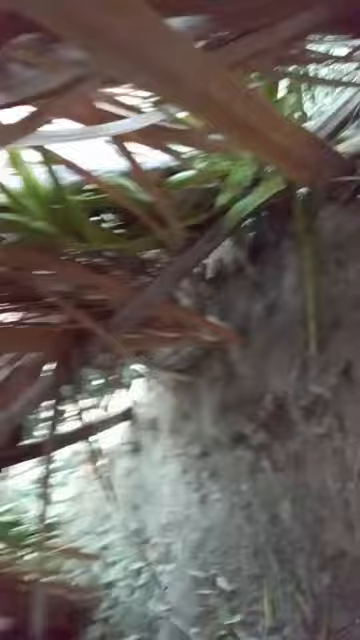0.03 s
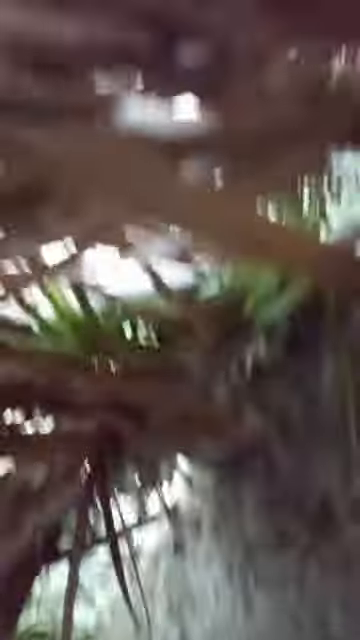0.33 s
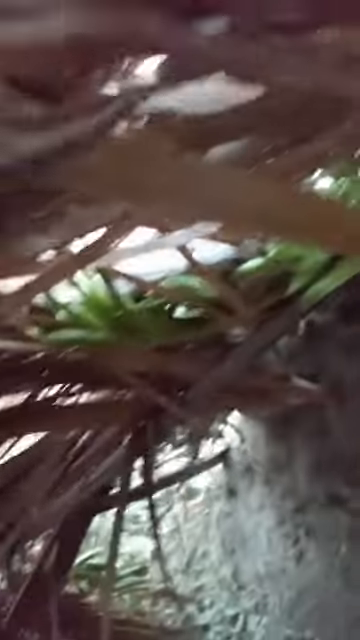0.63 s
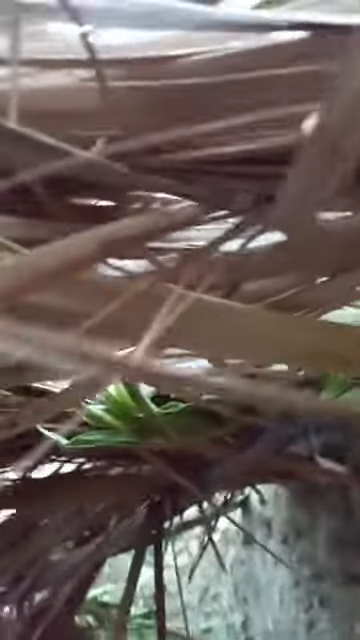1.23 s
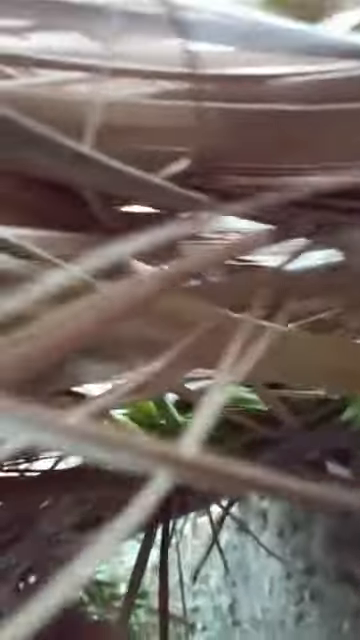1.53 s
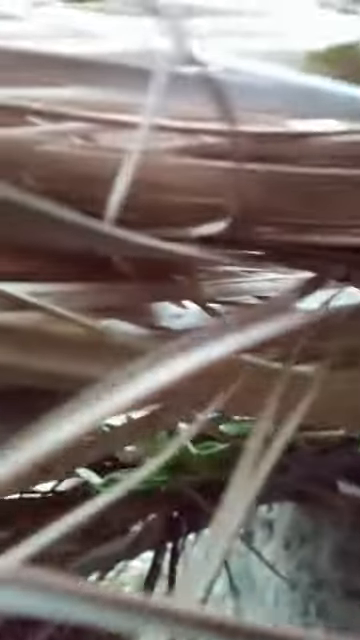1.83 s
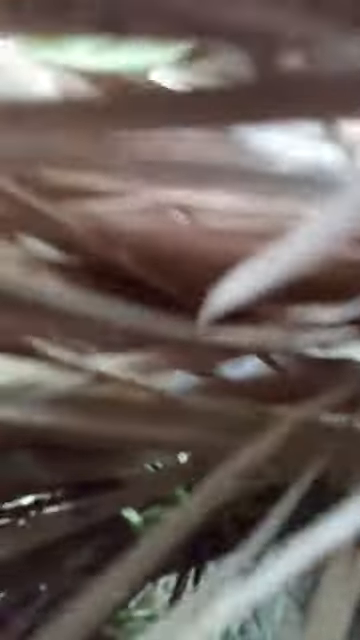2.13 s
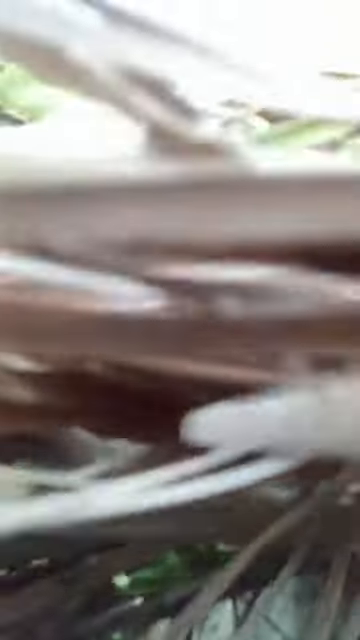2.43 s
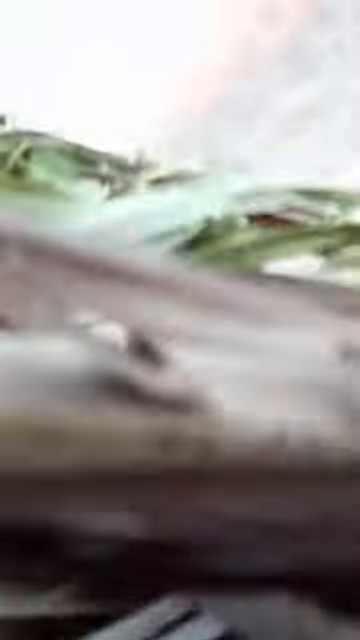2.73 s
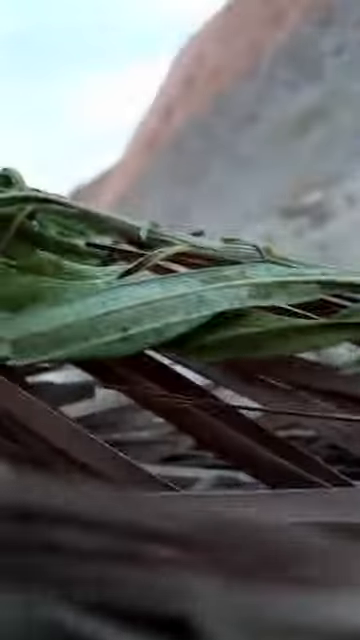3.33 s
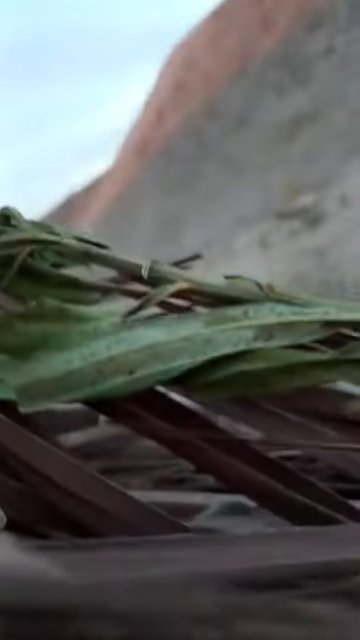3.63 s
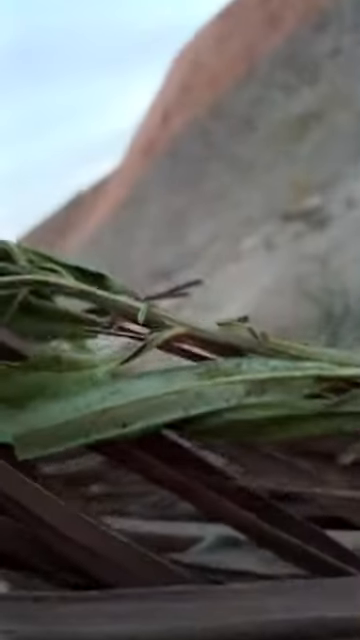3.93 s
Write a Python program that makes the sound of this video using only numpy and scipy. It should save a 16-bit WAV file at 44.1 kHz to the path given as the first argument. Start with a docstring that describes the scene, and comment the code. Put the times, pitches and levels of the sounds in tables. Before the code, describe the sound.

Dry stalks and leaves rustle and crackle as a microphone pushes through them outdoors. Soft wind thumps come first on the right, then crisp close snaps and scrapes take over, above a low rumble and a faint distant engine.

```python
"""A low outdoor rumble and faint hiss fade in as a microphone is pushed through dry stalks and fronds.
Leaves rustle over its two ports by stick-slip friction, and early on air buffets the right port.
Fibres snap in tight clusters of tiny fractures, leaves swish past, and a far engine drones and sinks
in pitch. In the second half, scraping stalks excite the resonances of the housing."""
import sys
import numpy as np
from scipy import signal
from scipy.fft import rfft, irfft
from scipy.io import wavfile

SR = 44100
rng = np.random.default_rng(int(sys.argv[2]) if len(sys.argv) > 2 else 0)


def persist_wave(psi):
    """Save psi, clipped to +-1, as 16-bit WAV."""
    counts = np.round(np.clip(psi, -1, 1) * 32767).astype(np.int16)
    wavfile.write(sys.argv[1], SR, np.atleast_2d(counts).T)


N = 176400
TIME = np.arange(N) / SR

# Spectra of the noise sources. Each row: frequency in Hz, relative level in dB.
RUMBLE_SPECTRUM = [(22,-31),(45,-21.5),(65,-5),(80,0),(130,1),(175,-10.5),(290,-14),(400,-22),(600,-32.5),(1000,-47.5),(3000,-73.5)]
HISS_SPECTRUM = [(100,12.5),(700,2.5),(1600,3.5),(3000,-1.5),(6300,-2.5),(8800,1.5),(11500,-5.5),(16000,-11.5)]
SLIDE_SPECTRUM = [(300,-4.5),(1000,-7),(2200,-4),(4000,-3),(5500,-3.5),(7500,-1),(9500,2),(12000,-4),(16000,-10)]
GUST_SPECTRUM = [(25,-29.5),(45,-5),(70,1),(110,-0.5),(170,-3.5),(250,-15.5),(400,-34.5),(800,-49.5),(2000,-69)]
SNAP_SPECTRUM = [(250,-11),(600,-12.5),(1100,-15.5),(2200,-10.5),(3600,-6.5),(5500,-4),(8000,-0.5),(10200,0.5),(12500,-5),(16000,-11)]
SWISH_SPECTRUM = [(300,-7.5),(1000,-14),(1900,-9),(3000,-6.5),(5500,-5),(7500,-1),(10200,0.5),(12500,-5.5),(16000,-8.5)]
# Envelopes of the sustained sources and the whole scene. Each row: time in seconds, level in dB.
SLIDE_LEFT_LEVEL = [(.3,-82),(1.25,-68.5),(1.5,-78.5),(2.1,-76.5),(2.35,-66.5),(2.41,-52),(2.5,-61),(2.68,-63),(2.77,-54),(2.85,-54),(2.97,-51.5),(3.06,-59),(3.16,-57),(3.21,-57.5),(3.35,-51.5),(3.58,-69),(3.67,-56.5),(3.76,-71),(3.82,-53),(4,-61)]
SLIDE_RIGHT_LEVEL = [(.3,-70),(.55,-73),(.63,-66),(1.2,-66.5),(1.35,-73.5),(2.05,-75),(2.3,-59.5),(2.36,-68),(2.41,-53),(2.57,-67),(2.78,-63),(2.86,-63),(2.9,-56.5),(2.99,-56.5),(3.1,-69.5),(3.22,-69.5),(3.33,-57),(3.43,-64),(3.75,-71),(4,-62.5)]
GUST_LEVEL = [(.3,-59),(.45,-65),(.55,-43.5),(.7,-46),(.81,-43.5),(.87,-36),(.95,-39.5),(1.01,-43),(1.08,-50.5),(1.14,-39),(1.25,-49.5),(1.33,-61),(1.6,-82)]
SCRAPE_LEVEL = [(2.2,-84),(2.37,-94),(2.405,-61.5),(2.48,-68.5),(2.65,-75),(2.8,-60),(2.86,-62.5),(2.99,-50),(3.04,-65.5),(3.14,-60.5),(3.25,-68),(3.37,-54.5),(3.44,-73),(3.76,-72.5),(3.83,-56.5),(3.88,-70),(3.93,-83),(4,-73)]
FADE_IN_LEVEL = [(0,-72),(.12,-46.5),(.2,-22),(.29,-4.5),(.5,-1)]
# Bumps of air. Each row: centre in seconds, level in dB, pitch in Hz, knock relative to thud in dB.
AIR_BUMPS = [(.494,-26.5,96,-21.5),(.625,-25.5,108,-15),(.874,-35,109,-4),(0.895,-34.5,99,-5.5),(0.913,-29,83.5,-3.5),(.945,-32.5,131,-17),(0.962,-31.5,107,-7),(1.164,-26.5,128,-3.5),(1.205,-28.5,95.7,-35),(2.399,-38,136,-0.5)]
# Cracking fibres and passing leaves. Each row: start in seconds, hold in seconds, relative level in dB,
# left over right in dB, tilt in dB per octave, resonance in Hz, its height in dB.
FIBRE_SNAPS = [(0.481, 0.0018, -60.5, -19, -4.5, 8200, 5), (0.693, 0.0044, -63, -11, -3, 13500, 14),
               (1.575, 0.0023, -59, 9, -1, 8100, 8), (2.083, 0.014, -64, 1, -1, 8500, 2),
               (2.173, 0.01, -63.5, 9, -0.3, 2100, 6), (2.37, 0.003, -54, 5, 3, 9400, 4),
               (2.382, 0.0052, -49.5, -3, 2.6, 2000, 8), (2.3986, 0.0081, -32.5, 0.5, 0.5, 9400, 3),
               (2.412, 0.0026, -44, -1, 3, 9200, 1), (2.543, 0.0053, -41.5, 8, 0.7, 2800, 0),
               (2.547, 0.01, -49, 2, -1.0, 8000, 2), (2.593, 0.002, -58, 18, 5, 12700, 8),
               (2.601, 0.006, -49.5, -5, -6.5, 12900, 11), (2.623, 0.0022, -53, 2, 1, 2000, 14),
               (2.6824, 0.0032, -38, 42, -3.5, 9060, 7.5), (2.698, 0.0025, -56, -13, -6.5, 2000, 2),
               (2.753, 0.0014, -49, 17, -5.5, 3240, 13), (2.89, 0.0084, -44.5, 12, -1.5, 7600, 1),
               (2.919, 0.0013, -42, 26, -3.76, 13500, 5), (2.924, 0.0017, -36, 20, 2.3, 2000, -7),
               (2.949, 0.0012, -43, 18, -3, 2000, 2), (2.981, 0.0073, -38.5, 22, -2, 12400, 7),
               (3.001, 0.0045, -36.5, 32, -0.5, 11400, 5), (3.029, 0.0014, -45, 26, -0.7, 7850, 7),
               (3.131, 0.0011, -50.5, 25, -0.2, 2000, 15.5), (3.346, 0.005, -35, 17, 6, 11600, 15),
               (3.3603, 0.0063, -29.5, 0, 1.5, 13200, 6), (3.374, 0.0062, -45, 2, -3.7, 9400, -1),
               (3.443, 0.0063, -46.5, 0, -1.7, 8000, 6), (3.547, 0.0022, -55, 2, -1, 7660, 5),
               (3.567, 0.0025, -55, 11, 1, 8100, 7.5), (3.616, 0.0021, -39, 14, 7, 12600, 10),
               (3.621, 0.0048, -53, 2, -4.5, 6000, 7), (3.629, 0.0024, -44, 9, 6.8, 2000, 10),
               (3.656, 0.004, -47, 8, 8, 2000, 10), (3.781, 0.012, -46.5, 12, 1.2, 8400, 2),
               (3.839, 0.0054, -40, 16, 5.5, 5400, 3), (3.8973, 0.0087, -29.5, 3, 2, 4980, 8.5)]
LEAF_SWISHES = [(0.593, 0.046, -64.5, -18, -1.3, 5730, 4), (0.766, 0.094, -65.5, -12, 7.5, 1930, 16),
                (1.034, 0.066, -55.5, -17, 6.5, 1980, 6), (1.195, 0.047, -63.5, -13, -0.5, 7800, 8),
                (1.272, 0.031, -66, -1, -1, 5000, 8), (1.566, 0.02, -64.5, 3, -0.5, 7600, 4),
                (1.703, 0.023, -49.5, 3, 0.5, 4970, 3.5), (1.829, 0.02, -61.5, 2, 1.2, 4760, 8.5),
                (2.114, 0.017, -65.5, -6, -4, 13500, 0), (2.423, 0.028, -55.5, 1, -2.9, 12700, 6),
                (2.81, 0.017, -54.5, 17, -5, 2230, 11), (2.902, 0.027, -50.5, 22, -2.2, 2000, 0),
                (2.965, 0.025, -47.5, 22, -2, 12800, 5), (3.325, 0.053, -44.5, 7.5, 4, 12900, 1.5),
                (3.644, 0.032, -58.5, -11, -1.5, 1980, 5), (3.812, 0.027, -41.5, 3.5, -0.5, 5170, 4),
                (3.914, 0.033, -50, 0.5, -0.9, 8100, 1.5)]
# The engine's drone. Each row: time in seconds, fundamental in Hz, level in dB.
ENGINE_DRONE = [(.3,123,-79),(1.4,122,-58),(2,119,-55.5),(2.65,112,-54.5),(3.3,108,-56.5),(4,104,-57)]
# Modes of the housing. Each row: frequency in Hz, bandwidth in Hz, relative gain in dB.
HOUSING_MODES = [(228,42,2.5),(348,109,0),(548,150,-3.5),(704,64,-2),(800,140,-11),(2000,650,-20)]


def from_db(db):
    """Amplitude grows tenfold for every 20 dB."""
    return 10 ** (np.asarray(db) / 20)


def unit_rms(x):
    """Normalisation to a mean power of one."""
    return x / np.sqrt(np.mean(x ** 2) + 1e-20)


def in_time(rows):
    """Linear interpolation of each column at every sample."""
    times, *columns = np.transpose(rows)
    return [np.interp(TIME, times, column) for column in columns]


def gain_curve(rows):
    """An amplitude envelope, linear in dB between its points."""
    return from_db(in_time(rows)[0])


def pan(db):
    """Constant-power panning: left exceeds right by db."""
    return unit_rms(from_db([[db / 2], [-db / 2]]))


def colour(x, spectrum, ripple_db=0):
    """Minimum-phase filtering to a spectrum with optional random resonances, at unit power."""
    n = x.shape[-1]
    hz = np.maximum(np.arange(n // 2 + 1) * SR / n, 1)
    points_hz, points_db = np.transpose(spectrum)
    db = np.interp(np.log(hz), np.log(points_hz), points_db)
    db -= 10 * np.log10(1 + (points_hz[0] / 2 / hz) ** 4)  # bass roll-off
    db += ripple_db * np.interp(hz / 300, np.arange(200), rng.standard_normal(200))
    cepstrum = irfft(np.log(from_db(db)), n)
    cepstrum[1:n // 2] *= 2  # folding makes the filter causal
    cepstrum[n // 2 + 1:] = 0
    return unit_rms(irfft(rfft(x) * np.exp(rfft(cepstrum)), n))


def impulses(n, per_s, spread_db):
    """A Poisson process of tiny slips or fractures, very uneven in size."""
    sizes = from_db(spread_db * np.minimum(rng.exponential(1, n), 4))
    return unit_rms(sizes * rng.choice([-1, 1], n) * (rng.random(n) < per_s / SR))


def at_ports(n, per_s, spread_db, shared):
    """Partial coherence: a share of the impulses reaches both ports, slightly apart in time."""
    both, left, right = [impulses(n, per_s, spread_db) for _ in range(3)]
    lag_s = rng.normal() * 0.0002
    common = np.array([both, np.roll(both, int(lag_s * SR))])
    return np.sqrt(shared) * common + np.sqrt(1 - shared) * np.array([left, right])


def flutter(n, per_s, depth_db):
    """Random amplitude modulation, as a gain."""
    wander = np.interp(np.arange(n) * per_s / SR, np.arange(4000), rng.standard_normal(4000))
    return from_db(depth_db * wander)


def leaf_burst(row, excitation, spectrum, attack_s, release_s, ripple_db):
    """Source and filter: impulses swell, hold and decay, exciting one leaf's resonances."""
    start, hold, db, side_db, tilt_db, ring_hz, ring_db = row
    n = excitation.shape[-1]
    first = max(int(start * SR) - n // 3, 0)
    t = (first + np.arange(n)) / SR - start
    envelope = np.exp(np.minimum(t, 0) / attack_s - np.maximum(t - hold, 0) / release_s)
    points_hz, points_db = np.transpose(spectrum)
    hz = np.geomspace(points_hz[0], points_hz[-1], 120)
    leaf_db = np.interp(np.log(hz), np.log(points_hz), points_db)
    leaf_db += tilt_db * np.log2(np.clip(hz, 1470, 12700))
    leaf_db += ring_db * np.exp(-(np.log2(hz / ring_hz) / 0.2) ** 2)  # half width 0.2 octave
    sound = colour(excitation * envelope, np.c_[hz, leaf_db], ripple_db)
    sound *= np.sqrt(np.mean(envelope ** 2))
    out = np.zeros((2, N + n))
    out[:, first:first + n] = from_db(db) * pan(side_db) * sound
    return out[:, :N]


def pressure_pulse(centre_s, hz, width_cycles):
    """A wave packet: a cycle or two of a windowed sinusoid."""
    cycles = (TIME - centre_s) * hz
    window = np.exp(-np.minimum(np.abs(cycles / width_cycles), 10) ** 1.37)
    return np.sqrt(2) * np.sin(2 * np.pi * (cycles + rng.random())) * window


def rumble_and_hiss(shared=0.88):
    """Ambient noise: the rumble is largely coherent between the ports, the hiss incoherent."""
    air = np.sqrt(shared) * rng.standard_normal(N) + np.sqrt(1 - shared) * rng.standard_normal((2, N))
    rumble = from_db(-55) * colour(air, RUMBLE_SPECTRUM)
    hiss = from_db(-73) * colour(rng.standard_normal((2, N)), HISS_SPECTRUM)
    return rumble + hiss


def sliding_leaves():
    """Stick-slip friction: leaves grip the ports unevenly, giving a fine rustle with lone dry ticks."""
    level = np.array([gain_curve(SLIDE_LEFT_LEVEL), gain_curve(SLIDE_RIGHT_LEVEL)])
    friction = at_ports(N, per_s=6000, spread_db=3.5, shared=0.12) * flutter(N, per_s=130, depth_db=2.2)
    ticks = from_db(-9) * at_ports(N, per_s=130, spread_db=2.5, shared=0.56)
    return level * colour(friction + ticks, SLIDE_SPECTRUM)


def buffeting_air():
    """Pressure fluctuations on the right port alone: a gust, and thuds topped by a harder knock."""
    air = gain_curve(GUST_LEVEL) * colour(rng.standard_normal(N), GUST_SPECTRUM)
    for centre_s, db, hz, knock_db in AIR_BUMPS:
        thud = pressure_pulse(centre_s, hz, width_cycles=0.75)
        knock = pressure_pulse(centre_s, hz=236, width_cycles=0.78)
        air += from_db(db) * (thud + from_db(knock_db) * knock)
    low_cut = signal.butter(2, 38, "high", fs=SR, output="sos")
    return np.array([np.zeros(N), signal.sosfilt(low_cut, air)])


def snapping_fibres():
    """Brittle fracture: each crack is a few milliseconds of packed tiny breaks."""
    out = np.zeros((2, N))
    for row in FIBRE_SNAPS:
        breaks = at_ports(2 ** 12, per_s=9000, spread_db=5.5, shared=0.44)
        out += leaf_burst(row, breaks, SNAP_SPECTRUM, attack_s=0.00096, release_s=0.0013, ripple_db=1.45)
    return out


def swishing_leaves():
    """Dense, fluttering friction as leaves brush past; the quicker the pass, the sharper its edges."""
    n = 2 ** 14
    out = np.zeros((2, N))
    for row in LEAF_SWISHES:
        attack_s, release_s = 0.28 * row[1], 0.35 * row[1]  # shares of the hold
        slips = at_ports(n, per_s=7000, spread_db=3.5, shared=0.33)
        slips *= flutter(n, per_s=300, depth_db=2.0)
        out += leaf_burst(row, slips, SWISH_SPECTRUM, attack_s, release_s, ripple_db=1.6)
    return from_db(0.33) * out


def far_engine():
    """A periodic source: a fundamental and weak second harmonic sink in pitch and waver in level."""
    hz, db = in_time(ENGINE_DRONE)
    phase = 2 * np.pi * np.cumsum(hz) / SR
    tone = np.sin(phase) + from_db(-22) * np.sin(2 * phase)
    return np.sqrt(2) * from_db(db) * flutter(N, per_s=14, depth_db=2.6) * tone


def scraping_stalks():
    """Forced vibration: coarse slips drive the housing's damped modes, summed in alternating sign."""
    slips = at_ports(N, per_s=1500, spread_db=4, shared=0.36)
    housing = np.zeros((2, N))
    for k, (hz, width_hz, db) in enumerate(HOUSING_MODES):
        radius = np.exp(-np.pi * width_hz / SR)
        feedback = [1, -2 * radius * np.cos(2 * np.pi * hz / SR), radius ** 2]
        mode = (1 - radius ** 2) * signal.lfilter([1, 0, -1], feedback, slips)
        housing += (-1) ** k * from_db(db) * mode
    return gain_curve(SCRAPE_LEVEL) * pan(db=14) * unit_rms(housing)


def scene():
    """Superposition of all sources at the two ports."""
    return (rumble_and_hiss() + sliding_leaves() + buffeting_air() + snapping_fibres()
            + swishing_leaves() + far_engine() + scraping_stalks())


def record(dry):
    """Band limiting: the level fades in and a steep low-pass removes the highest treble."""
    low_pass = signal.ellip(10, 0.2, 70, 15850, fs=SR, output="sos")
    return signal.sosfilt(low_pass, dry * gain_curve(FADE_IN_LEVEL))


dry = scene()
out = record(dry)
persist_wave(out)
```